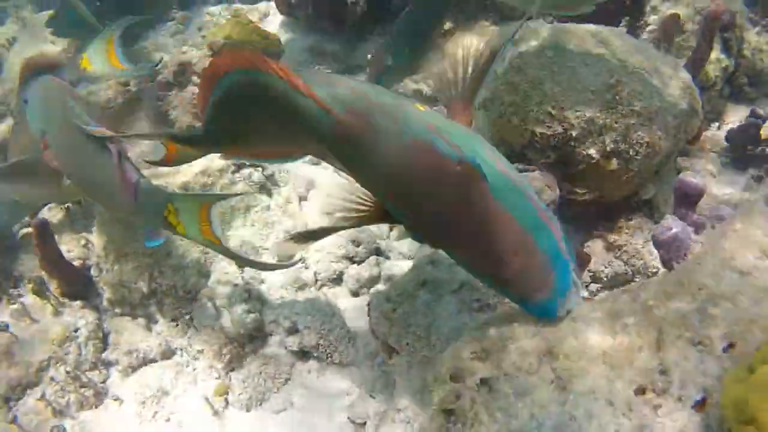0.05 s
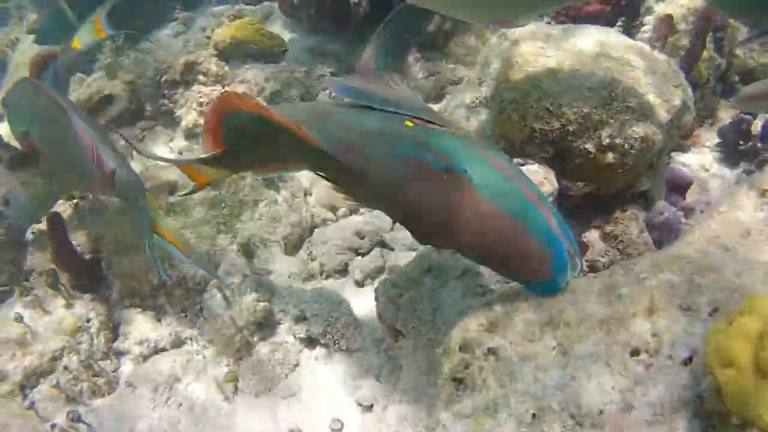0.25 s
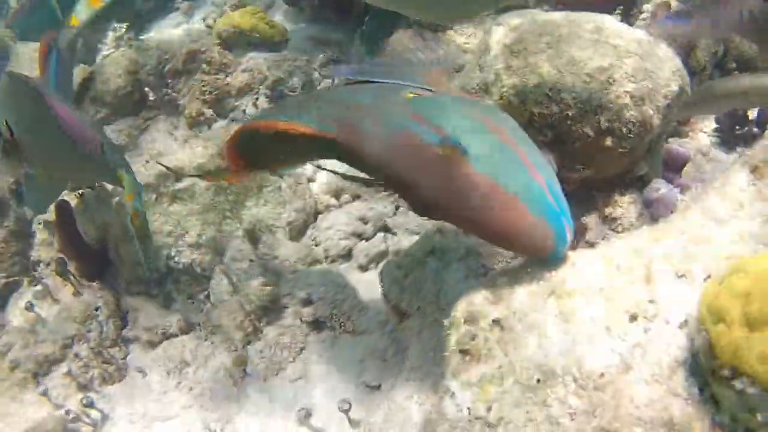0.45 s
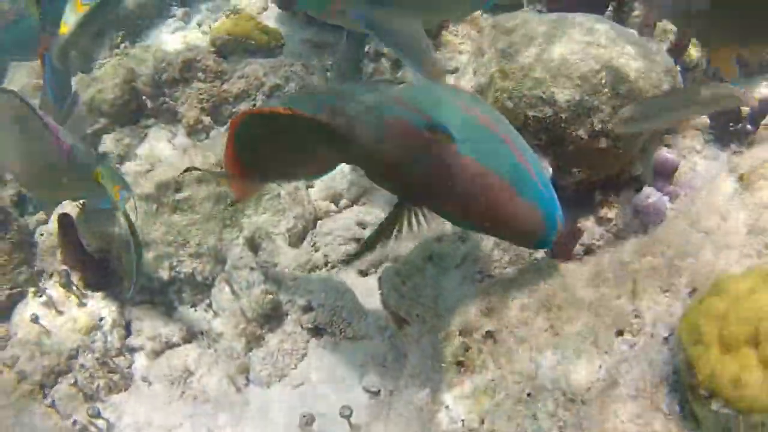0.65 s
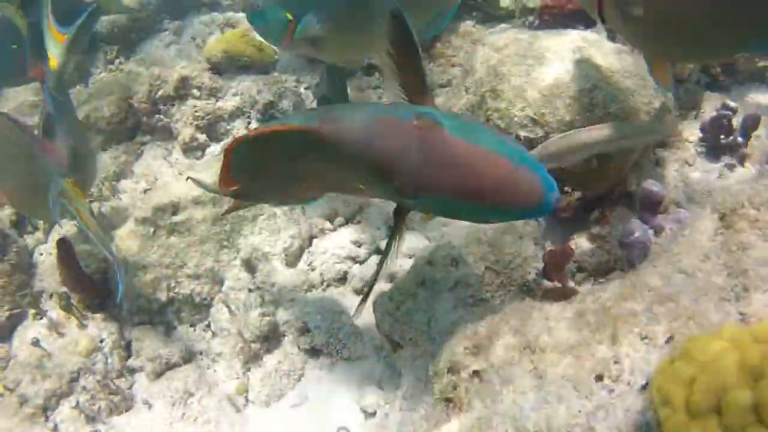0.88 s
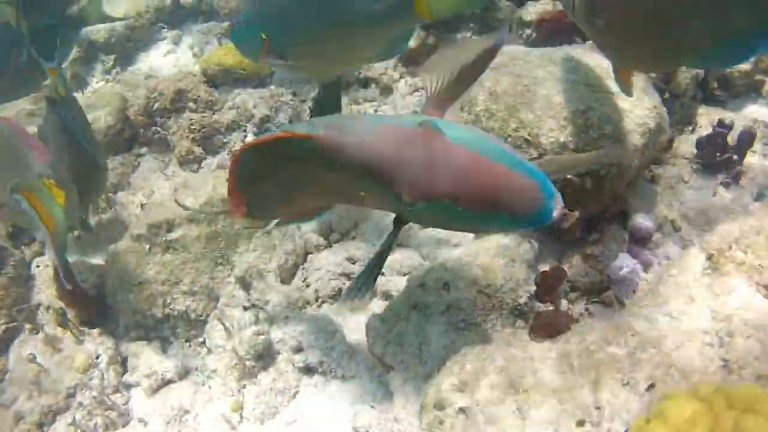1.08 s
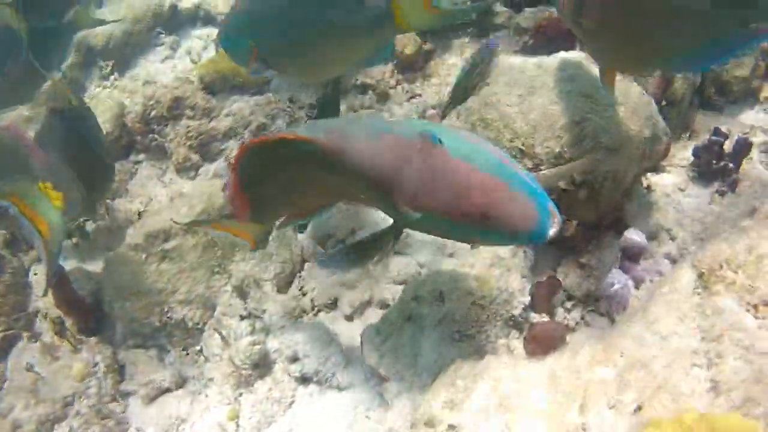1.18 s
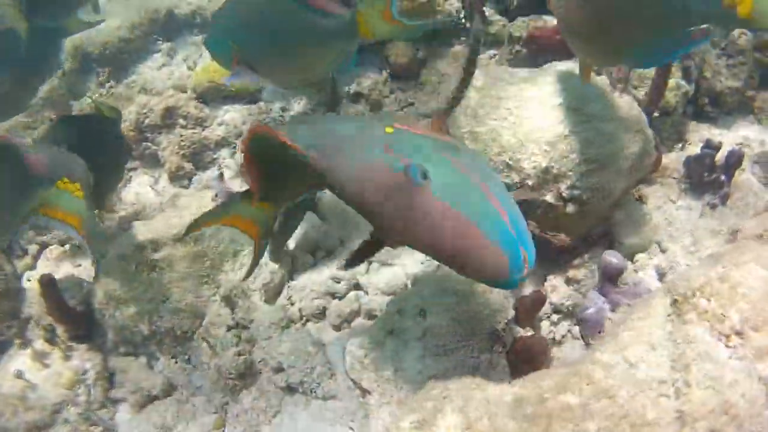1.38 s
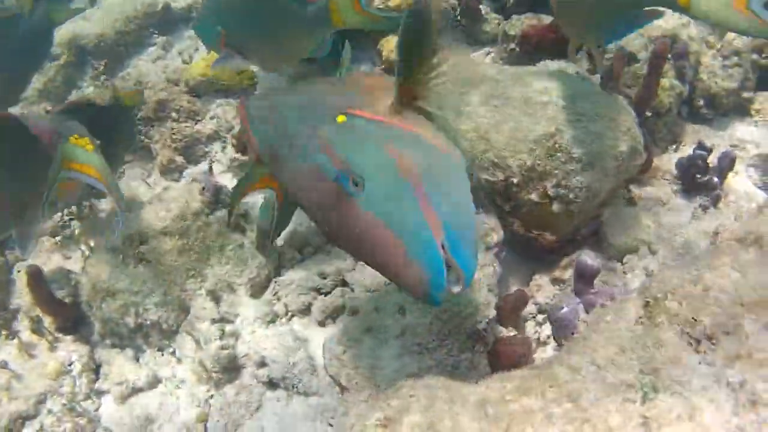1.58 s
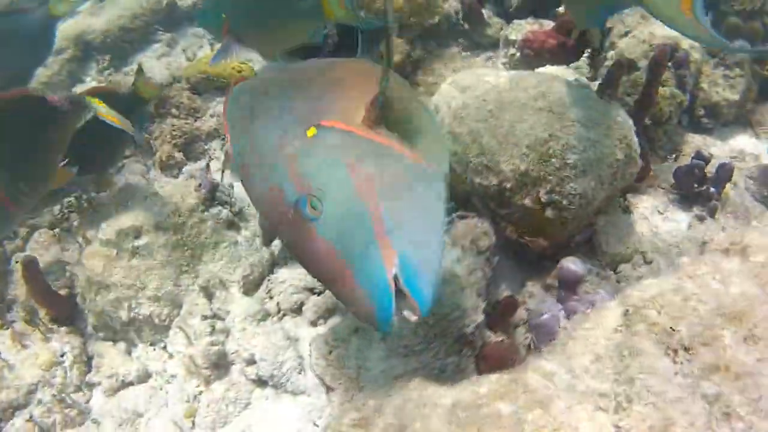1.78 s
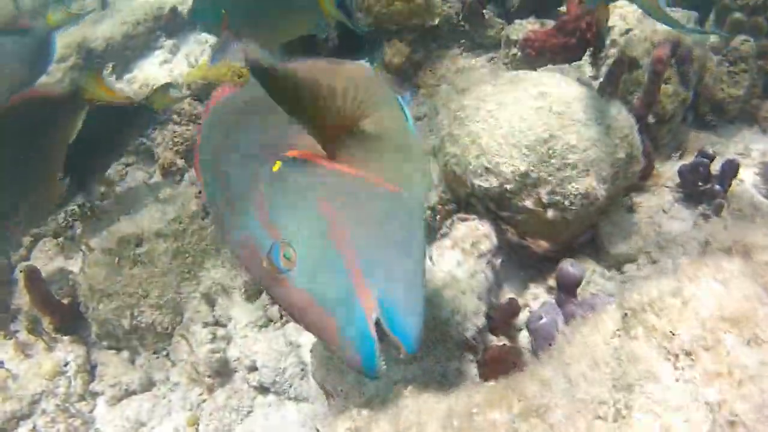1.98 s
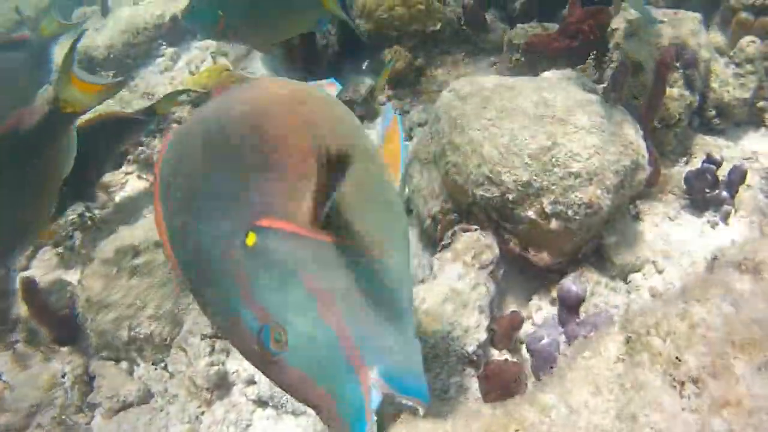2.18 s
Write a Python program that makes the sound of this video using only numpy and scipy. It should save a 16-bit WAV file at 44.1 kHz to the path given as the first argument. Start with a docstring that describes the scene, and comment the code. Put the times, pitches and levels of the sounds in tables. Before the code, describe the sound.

A parrotfish crunches and scrapes coral underwater, over a low rumble and faint reef crackle.

```python
"""Under water on a reef, the microphone in a ringing camera housing, close to a feeding parrotfish.
Moving water rumbles and the far reef crackles throughout. The beak rasps coral rock in a first, loudest
bout: each fracture is a thud, a crack and a spray of grit, with fine scraping between. From 0.2 s sharp
snaps, likely shrimp, come from the reef. A second bout follows near 0.9 s and a third near 1.6 s.
Last comes a faint whine in three short runs, perhaps the focus motor."""
import sys
import numpy as np
from scipy import signal
from scipy.fft import rfft, irfft, next_fast_len
from scipy.io import wavfile
from scipy.ndimage import map_coordinates

SR = 44100
rng = np.random.default_rng(int(sys.argv[2]) if len(sys.argv) > 2 else 0)


def waveform_to_disk(signal):
    """Save audio, clipped to [-1, 1], as 16-bit WAV at the path in sys.argv[1]."""
    frames = np.transpose(np.atleast_2d(signal))
    scaled = np.clip(frames, -1, 1) * 32767
    samples = np.round(scaled).astype(np.int16)
    wavfile.write(sys.argv[1], SR, samples)


N = 99225

# resonances of the housing round the microphone: pitch_hz, width_hz, level_db
WALL_MODES = [(85.5, 140, -9), (241.5, 257, -2), (352.1, 56, 1.5), (392.3, 21, 0), (501.4, 129.5, -3.5),
              (596, 91, -3), (767, 73, -11)]
PANEL_MODES = [(973, 110, -10.5), (1412, 370, -1), (2118, 450, 0), (2723, 350, -8), (3550, 590, -12.5),
               (4535, 1020, -15)]
TREBLE_MODES = [(7650, 3700, -7), (9190, 560, -5.5), (9900, 370, 5), (10610, 350, 3.5), (11450, 310, 5.5),
                (12000, 380, 12), (13330, 400, 1), (14180, 530, 0.5)]
SNAP_TREBLE_MODES = [(8700, 5300, -7.5), (9620, 490, 7.5), (14200, 670, 3.5)]  # the treble ring under a snap
HARD_PANEL_MODE = [(1410, 160, 0.015)]  # a panel that only hard breaks drive fully
# dead spots of the housing: centre_hz, width_hz
DEAD_SPOTS = [(6050, 770), (12020, 110)]
# spectral shapes of the moving water and the far reef's fizz: frequency_hz, level_db
WATER_SPECTRUM = [(35, -12.5), (70, 5), (130, -6), (470, -15), (620, -12), (770, -18), (900, -59)]
FIZZ_SPECTRUM = [(700, -21), (1000, 5.5), (1700, -11), (2000, -3), (4600, -6), (6000, -11.5), (9800, -8.5),
                 (10800, -27), (11500, -17), (15500, -31)]
# the note of far snaps: pitch_hz, width_hz, level_db
FAR_SNAP_MODES = [(2060, 370, 0)]
# runs of the whine: start_s, length_s, level_db, first_pitch_hz, last_pitch_hz
WHINE_RUNS = [(1.732, 0.067, -64.5, 634, 533), (1.809, 0.075, -69.5, 758, 729),
              (2.013, 0.076, -66.5, 647, 638)]
# sharp snaps from the reef: start_s, level_db, pitch_hz, thud_db, treble_db
SNAPS = [(0.199, -51, 2400, -38.5, -58), (0.321, -52.5, 2160, -51, -66), (0.6798, -43, 2140, -42.5, -54),
         (0.735, -40.5, 2110, -41.5, -49.5), (.752, -46, 2134, -70, -56), (1.0688, -41.5, 2240, -40, -51.5),
         (1.089, -44.5, 2070, -39, -54.5), (1.376, -48, 2070, -44, -61), (1.4242, -45, 2160, -74, -56),
         (1.784, -44.5, 2840, -76, -52), (1.842, -62.5, 2680, -76, -70)]
# short rasping strokes that ring one panel of the housing: start_s, length_s, level_db, pitch_hz
STROKES = [(0.1, 0.062, -52, 1380), (0.377, 0.01, -45, 2160), (0.895, 0.042, -68.5, 2090),
           (1.588, 0.068, -55.5, 1345)]
# course of the scraping between fractures: time_s, grind_db, rasp_db
SCRAPE_LEVELS = [(0.025, -57.5, -66.5), (0.115, -41.5, -62), (0.18, -44.5, -53), (0.208, -50, -99),
                 (0.24, -40, -38.5), (0.275, -26, -42), (0.31, -48.5, -63), (0.4, -32.5, -51),
                 (0.49, -31.5, -50.5), (0.553, -40.5, -42.5), (0.58, -48, -60.5), (0.68, -54.5, -52.5),
                 (0.84, -49.5, -67), (0.915, -43.5, -50), (0.985, -55.5, -62.5), (1.17, -52.5, -65.5),
                 (1.3, -64, -71), (1.36, -52, -66.5), (1.5, -66, -69), (1.535, -35.5, -55),
                 (1.58, -49.5, -59), (1.63, -38.5, -53.5), (1.695, -48, -57), (1.78, -61, -70),
                 (2.24, -57.5, -66.5)]
# hollow knocks of larger pieces of rock: start_s, level_db, pitch_hz, width_hz
KNOCKS = [(0.869, -46, 1054, 280), (1.344, -39, 331, 85)]
# fractures under the beak, close by: start_s, thud_db, crack_db
FRACTURES = [(0.0608, -38, -56.5), (0.0792, -37, -53.5), (0.1346, -35, -52), (0.1712, -35.5, -49),
             (0.2196, -26, -46.5), (0.229, -23.5, -46), (0.238, -31, -35.5), (0.2474, -28, -46),
             (0.2598, -16, -33), (0.2821, -25, -57), (0.3432, -10, -22.5), (0.386, -17.5, -37.5),
             (0.4149, -12, -26.5), (0.46, -38, -34), (0.468, -15.5, -38.5), (0.4745, -25, -36.5),
             (0.4808, -29, -34.5), (0.5386, -32.5, -38), (0.544, -22.5, -37), (0.826, -37.5, -56),
             (0.8704, -25, -56.5), (0.877, -23, -59.5), (0.9, -28, -49), (0.9605, -32, -51),
             (1.006, -31, -55.5), (1.06, -32, -44), (1.0988, -37.5, -47.5), (1.204, -42, -78),
             (1.3434, -36.5, -58.5), (1.5528, -26, -43), (1.5984, -32.5, -49.5), (1.626, -28.5, -49),
             (1.637, -32.5, -49), (1.673, -32.5, -42.5), (1.6875, -30.5, -44.5), (1.74, -36, -48),
             (1.993, -50.5, -61)]

RUMBLE_DB, DRONE_DB, WATER_DB = -56, -61, -60.5
FIZZ_DB, FAR_SNAP_DB = -73, -74.5
GRIND_TRIM_DB, RASP_TRIM_DB, SAND_TRIM_DB = -0.5, -3.5, -14.5
THUD_TRIM_DB, CRACK_TRIM_DB, GRIT_TRIM_DB = -1, -1.5, -14.5
RASP_LOW_HZ, RASP_TOP_HZ = 1230, 4200  # the band that small grains excite
THUD_TOP_HZ, CRACK_TOP_HZ = 944, 2820  # softness of the contact
THUD_T60_S, CRACK_T60_S, GRIT_T60_S, SNAP_T60_S = 0.037, 0.027, 0.029, 0.023


def amp(db):
    return 10 ** (np.asarray(db) / 20)


def unit(x):
    return x / np.sqrt(np.mean(x ** 2) + 1e-20)


def gain_at(spectrum, hz):
    """Gain read from (Hz, dB) points on a log axis."""
    points_hz, db = np.transpose(spectrum)
    return amp(np.interp(np.log(hz + 1), np.log(points_hz + 1), db))


def wobble(knots_per_s):
    """A smooth random curve."""
    knots = rng.standard_normal(int(N * knots_per_s / SR) + 4)
    return map_coordinates(knots, [np.arange(N) * knots_per_s / SR])


def filtered(x, response):
    """x shaped by a function of frequency."""
    size = next_fast_len(N + SR // 2)
    return irfft(rfft(x, size) * response(np.fft.rfftfreq(size, 1 / SR)), size)[:N]


def butter(x, order, hz, kind="low"):
    return signal.sosfilt(signal.butter(order, hz, kind, fs=SR, output="sos"), x)


def ring(modes, size=8192):
    """Causal impulse response, energy 1, of a set of resonances."""
    f = np.fft.rfftfreq(size, 1 / SR) + 1
    power = sum((amp(db) / (1 + ((f / hz - hz / f) * hz / width) ** 2)) ** 2 for hz, width, db in modes)
    cepstrum = irfft(np.log(power + 1e-12) / 2)
    cepstrum[1:size // 2] *= 2  # fold to minimum phase
    cepstrum[size // 2 + 1:] = 0
    response = irfft(np.exp(rfft(cepstrum)))
    return response / np.linalg.norm(response)


def note(hz, width_hz):
    """The ring of a single resonance."""
    return ring([(hz, width_hz, 0)])


def blow(response, t60_s, splinter_share):
    """One impulse and its dying splinters through a response, with the energy of 6 ms at rms 1."""
    splinters = rng.standard_normal(2048) * amp(-60 * np.arange(2048) / SR / t60_s)
    force = splinter_share * splinters / np.linalg.norm(splinters)
    force[0] += 1
    sound = signal.fftconvolve(force, response)
    return sound / np.linalg.norm(sound) * np.sqrt(0.006 * SR)


def add(track, start_s, sound):
    """Lay a sound into a track."""
    part = track[max(round(start_s * SR), 0):][:len(sound)]
    part += sound[:len(part)]


def grains(per_s=500, spread_db=2.5):
    """Random tiny impulses of uneven size."""
    impulses = (rng.random(N) < per_s / SR) * rng.choice([-1, 1], N)
    return impulses * amp(spread_db * np.clip(rng.standard_normal(N), -2.5, 2.5))


def struck(force, response):
    """A running force through a response, at rms 1."""
    return unit(signal.fftconvolve(force, response)[:N])


def rattle(modes):
    """Each resonance is struck by its own grains, so that every grain has a pitch."""
    return sum(amp(db) * np.sqrt(width) * struck(grains(), note(hz, width)[:1024])
               for hz, width, db in modes)


def swell(length_s, fade_s=0.01):
    """A smooth rise, hold and fall."""
    t = np.arange(int(length_s * SR)) / SR
    ramp = np.minimum(t, length_s - t) / min(fade_s, length_s / 2)
    return np.sin(np.pi / 2 * np.clip(ramp, 0, 1))


def far_reef():
    """Countless distant snaps merge into a fizz, with single pops standing out."""
    crackle = grains(per_s=5200, spread_db=5.5)
    fizz = unit(filtered(crackle, lambda hz: gain_at(FIZZ_SPECTRUM, hz) * hz / (hz + 300)))
    pops = sum(amp(db) * struck(grains(per_s=53, spread_db=7.5), note(hz, width))
               for hz, width, db in FAR_SNAP_MODES)
    return amp(FIZZ_DB) * fizz + amp(FAR_SNAP_DB) * pops


def moving_water():
    """Water rumbles and drones round the housing, under a slightly wavering wash."""
    def deep_band(hz, width_hz):
        return unit(signal.fftconvolve(rng.standard_normal(N + 8191), note(hz, width_hz), "valid"))

    rumble = amp(RUMBLE_DB) * deep_band(hz=27, width_hz=22)
    drone = amp(DRONE_DB) * deep_band(hz=54.6, width_hz=14)
    noise = rng.standard_normal(N)
    wash = unit(filtered(noise, lambda hz: gain_at(WATER_SPECTRUM, hz) / (1 + (hz / 1500) ** 4)))
    return rumble + drone + amp(WATER_DB + 0.78 * wobble(knots_per_s=5.93)) * wash


def whine(trim_db=6.02, third_db=-13):
    """A thin tone with a weak third harmonic starts, glides down and stops."""
    out = np.zeros(N)
    for start_s, length_s, db, first_hz, last_hz in WHINE_RUNS:
        shape = swell(length_s)
        phase = 2 * np.pi * np.cumsum(np.linspace(first_hz, last_hz, len(shape))) / SR
        tone = np.sqrt(2) * (np.sin(phase) + amp(third_db) * np.sin(3 * phase))
        add(out, start_s, amp(db + trim_db) * shape * tone)
    return out


def snaps(wall):
    """Short bright clicks from the reef, each with its own pitch and a light thud in the housing wall."""
    out, treble = np.zeros(N), ring(SNAP_TREBLE_MODES)
    for start_s, db, hz, thud_db, treble_db in SNAPS:
        width_hz = 710 * (hz / 2000) ** 2.2  # higher snaps are shorter
        click = signal.fftconvolve(note(hz, width_hz)[:1024], note(hz, 2 * width_hz)[:1024])
        add(out, start_s, amp(db) * blow(click, SNAP_T60_S, splinter_share=1))
        add(out, start_s, amp(treble_db) * blow(treble, SNAP_T60_S, splinter_share=1.6))
        add(out, start_s, amp(thud_db) * blow(wall, SNAP_T60_S, splinter_share=0.2))
    return out


def tooth_strokes():
    """The teeth catch and chatter: dense grains on one resonance."""
    out = np.zeros(N)
    for start_s, length_s, db, hz in STROKES:
        shape = swell(length_s)
        chatter = signal.fftconvolve(grains(per_s=1300), note(hz, width_hz=250), "valid")
        add(out, start_s, amp(db) * shape * unit(chatter[:len(shape)]))
    return out


def scraping(wall):
    """The beak drags over rock: grinding in the walls, rasp in the panels, sand in the treble ring."""
    def rasp_band(hz):
        return hz / np.hypot(hz, RASP_LOW_HZ) / np.sqrt(1 + (hz / RASP_TOP_HZ) ** 10)

    time_s, *columns = np.transpose(SCRAPE_LEVELS)
    grind_db, rasp_db = [np.interp(np.arange(N) / SR, time_s, db) for db in columns]
    grind = amp(grind_db + GRIND_TRIM_DB) * struck(grains(), wall)
    rasp = amp(rasp_db + RASP_TRIM_DB) * unit(filtered(rattle(PANEL_MODES), rasp_band))
    sand = amp((grind_db + rasp_db) / 2 + SAND_TRIM_DB) * unit(rattle(TREBLE_MODES))
    return grind + rasp + sand


def knocks():
    """A larger piece of rock gives way with a hollow note of its own."""
    out = np.zeros(N)
    for start_s, db, hz, width_hz in KNOCKS:
        add(out, start_s, amp(db) * blow(note(hz, width_hz), THUD_T60_S, splinter_share=0.34))
    return out


def fractures(wall):
    """Coral breaks under the beak, close to the microphone: thud, crack and grit ring the housing."""
    out, treble, hard_panel = np.zeros(N), ring(TREBLE_MODES), ring(HARD_PANEL_MODE)
    soft_wall = butter(wall, 2, THUD_TOP_HZ)
    soft_panel = butter(ring(PANEL_MODES), 1, CRACK_TOP_HZ)
    for start_s, thud_db, crack_db in FRACTURES:
        low_cut_hz = 24.2 * 2 ** (-0.04 * thud_db)  # smaller breaks are less deep
        thud = blow(butter(soft_wall, 2, low_cut_hz, "high"), THUD_T60_S, splinter_share=0.69)
        crack = blow(soft_panel, CRACK_T60_S, splinter_share=1)
        clack = blow(hard_panel, CRACK_T60_S, splinter_share=0.154)
        grit = blow(treble, GRIT_T60_S, splinter_share=3.3)
        add(out, start_s, amp(thud_db + THUD_TRIM_DB) * thud)
        add(out, start_s, amp(crack_db + CRACK_TRIM_DB) * crack)
        add(out, start_s, amp(1.99 * crack_db + 22) * clack)  # grows twice as fast in dB as the crack
        add(out, start_s, amp((thud_db + crack_db) / 2 + GRIT_TRIM_DB) * grit)
    return out


def scene():
    """Reef and water behind, the beak close up, all on one microphone in the housing."""
    wall = ring(WALL_MODES)
    chatter = tooth_strokes() + tooth_strokes()  # two layers, each with its own grains
    beak = fractures(wall) + knocks() + scraping(wall) + chatter
    return (far_reef() + moving_water() + whine() + snaps(wall) + beak)[None]


def record(dry, top_hz=16000):
    """The housing swallows two narrow bands, and the camera keeps nothing above its band limit."""
    def response(f):
        notches = [(hz ** 2 - f ** 2) / (hz ** 2 - f ** 2 + 1j * f * width) for hz, width in DEAD_SPOTS]
        return np.prod(notches, axis=0) / np.sqrt(1 + (f / top_hz) ** 80)

    return filtered(dry[0], response)[None]


dry = scene()
out = record(dry)
waveform_to_disk(out)
```